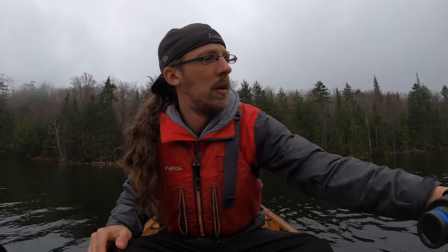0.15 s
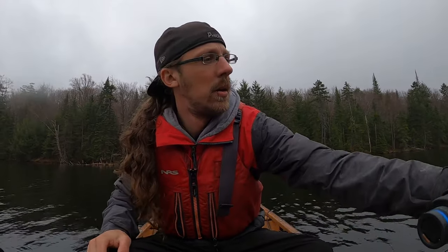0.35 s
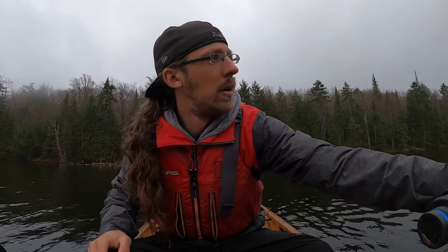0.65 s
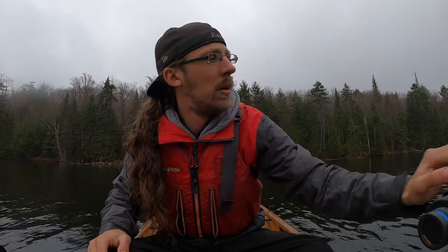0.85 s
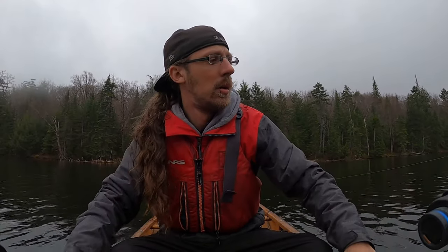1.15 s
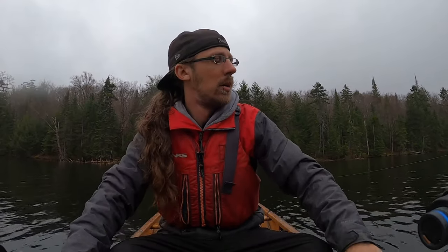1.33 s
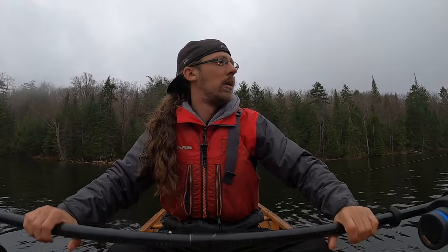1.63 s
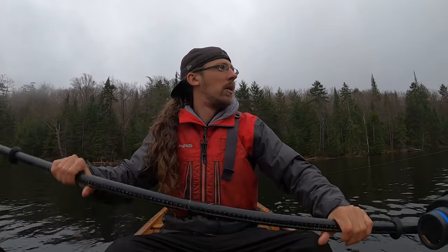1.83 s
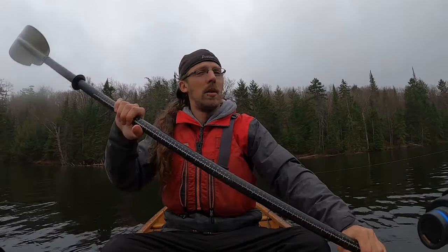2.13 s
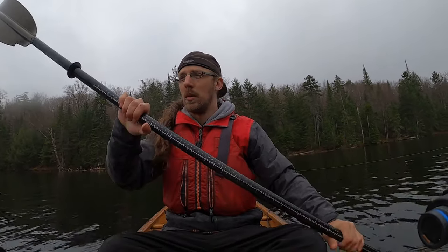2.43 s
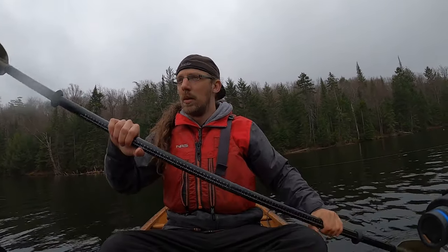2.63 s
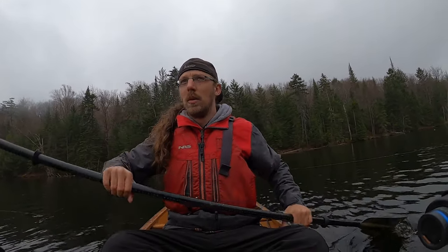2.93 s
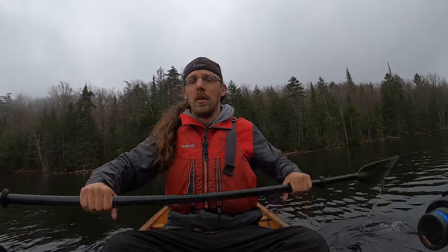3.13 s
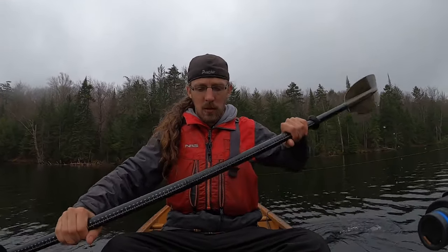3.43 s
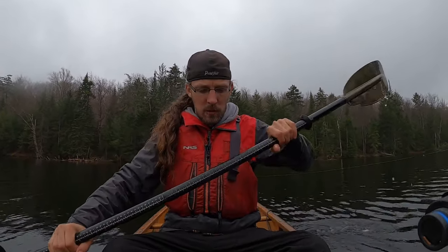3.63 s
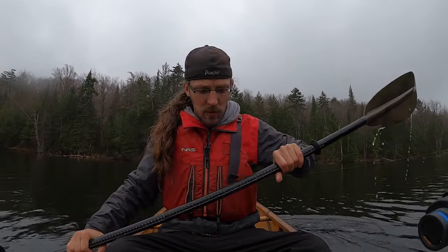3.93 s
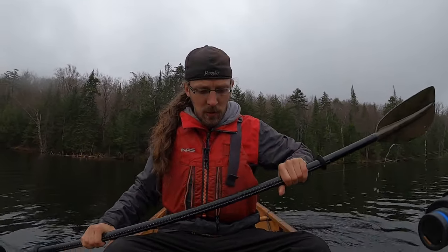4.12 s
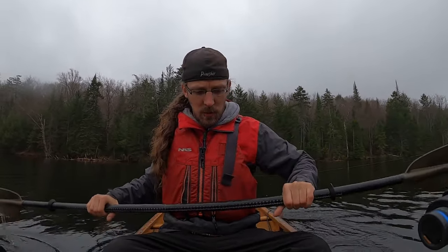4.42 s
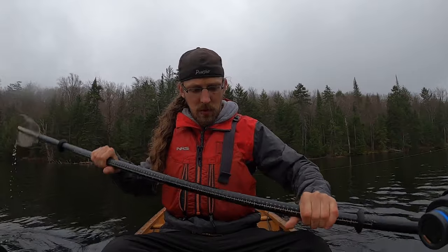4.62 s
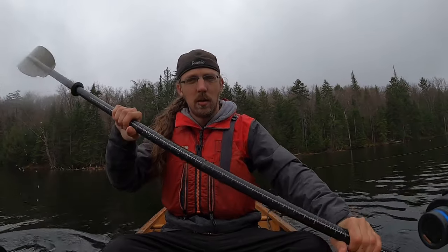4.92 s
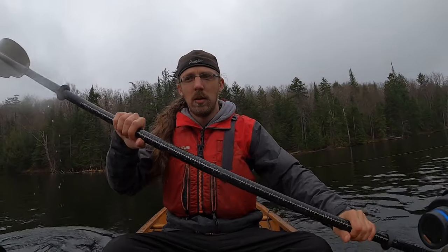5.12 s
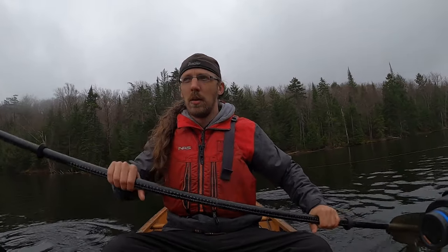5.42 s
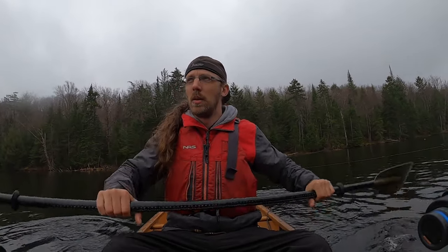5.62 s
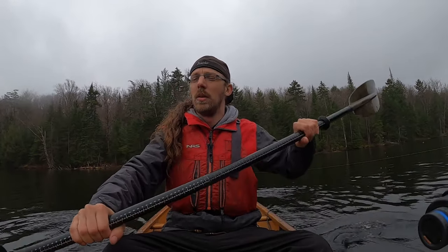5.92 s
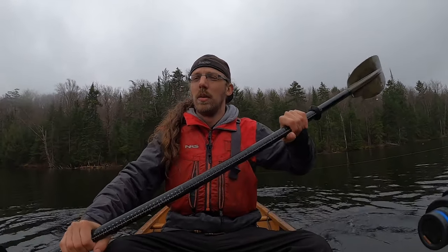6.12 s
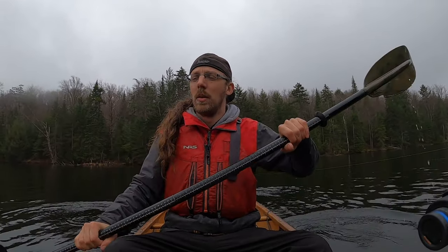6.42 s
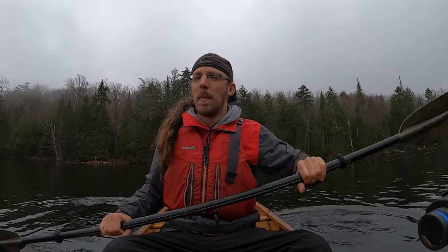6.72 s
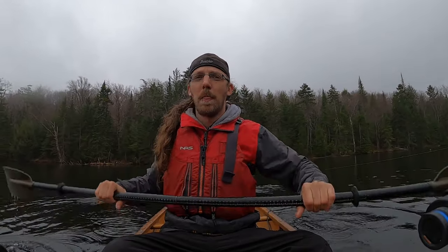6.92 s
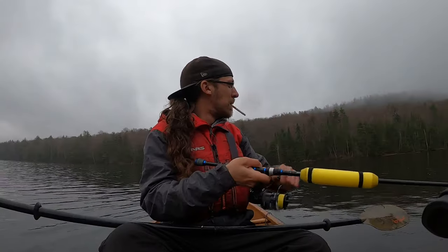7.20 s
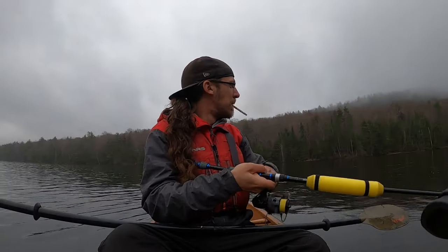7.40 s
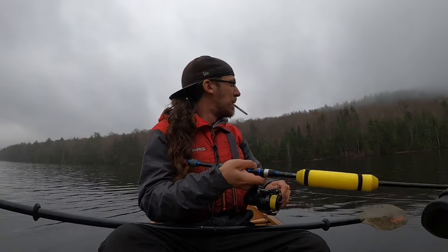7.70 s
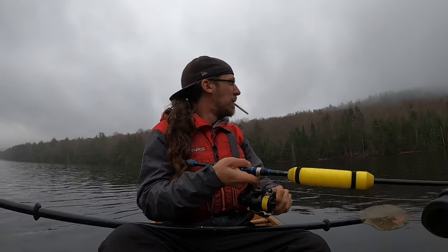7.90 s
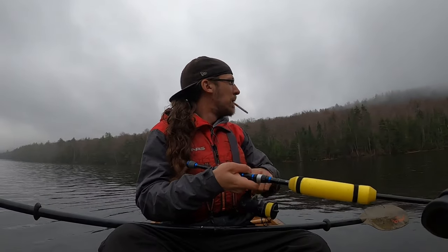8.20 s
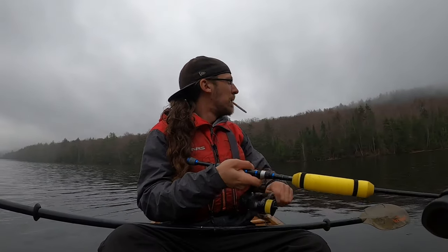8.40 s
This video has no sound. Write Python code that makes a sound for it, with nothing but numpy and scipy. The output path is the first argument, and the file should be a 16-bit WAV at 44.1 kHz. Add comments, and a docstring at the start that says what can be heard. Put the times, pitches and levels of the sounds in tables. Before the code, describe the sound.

In a canoe on a calm lake, wood thuds and nylon swishes give way to close paddle strokes, then a ticking, whirring fishing reel.

```python
"""Canoe on a quiet lake

Out on the water, with the microphone in the boat, a sleeve swishes and the wooden hull booms from blows
on its modes as a double paddle is picked up off the gunwales; its shaft clacks in short bursts of noise.
Four strokes follow, the first centred, then left, right and left: chirping bubbles plop, noise churns, drops fall.
A spinning reel is cranked in two bursts, its rubbing tones and ticking gear teeth following the speed.
Behind it lie the air, ripples on the hull and a light breeze on the microphone."""
import sys
import numpy as np
from scipy import signal
from scipy.fft import rfft, irfft, next_fast_len
from scipy.io import wavfile
from scipy.ndimage import uniform_filter1d, map_coordinates

SR = 44100
rng = np.random.default_rng(int(sys.argv[2]) if len(sys.argv) > 2 else 0)


def wrap_up_sound(samples):
    """Save the sound to the file named by the first command line argument, as 16-bit audio."""
    columns = np.atleast_2d(samples).T
    # keep every value between -1 and 1, then stretch to whole-number steps
    tamed = np.clip(columns, -1, 1)
    steps = np.round(tamed * 32767).astype(np.int16)
    wavfile.write(sys.argv[1], SR, steps)


N = 377055  # length in samples

WET_FROM_S, WET_TO_S = 2.38, 7.18  # the paddle works the water between these times
# The soft wash outgrows the bubbles by this power of the churn; at this churn its level is left unscaled.
WASH_GROWTH, WASH_UNSCALED_DB = .3, -43
WASH_SIDE_SHARE = 0.59  # the wash is spread wider than single plops, so it leans less to the blade's side
# Colours of the wash, deep to fine. Each row: frequency in Hz, relative density in dB per Hz.
GURGLE_SPECTRUM = [(130, -33), (260, -18), (480, 3), (720, 0), (1100, -9)]
CHURN_SPECTRUM = [(450, -22), (800, -1), (1400, 11.5), (2200, 2), (3000, -4), (4500, -43)]
SPRAY_SPECTRUM = [(1800, -1), (3100, -0.5), (5000, -10), (7500, -15), (9500, -22), (13000, -27.5),
                  (16000, -39)]


def strokes():
    """The blade folds in large bubbles, churns up middling ones and throws fine spray, over a soft wash."""
    gurgle, churn, spray = stirring()
    bubbles = gurgle * from_db(3.5) * swarm(per_s=120, low_hz=381.4, high_hz=800, cycles=31.7, rise=0.59)
    bubbles += churn * from_db(-1.0) * swarm(per_s=520, low_hz=826.0, high_hz=2986, cycles=31, rise=0.5)
    bubbles += spray * from_db(-1.5) * swarm(per_s=260, low_hz=2964, high_hz=7500, cycles=35, rise=0.18)
    bubbles += drops(tick_db=-15, tick_t60=0.0071)
    near = plops(tick_db=-24, tick_t60=0.01) + glugs(rough=0.48)
    near += splats(octaves=0.763, cycles=14.5, slap_db=-14.5)

    wash = gurgle * from_db(3.0) * noise(GURGLE_SPECTRUM)
    wash += churn * from_db(-5) * noise(CHURN_SPECTRUM)
    wash += spray * from_db(-0.5) * noise(SPRAY_SPECTRUM)
    wash *= (churn / from_db(WASH_UNSCALED_DB)) ** WASH_GROWTH * from_db(2.26 * drift(60))

    side_db = blade_side()
    spread = in_boat(bubbles, echo_db=-9.5, t60=0.083, apart=1.6) + wash
    near = in_boat(near, echo_db=-9.5, t60=0.059, apart=1.0)
    return spread * pan(WASH_SIDE_SHARE * side_db) + near * pan(side_db)


# The paddle strokes. Each row: blade in, hardest pull and blade out in seconds, gurgle, churn, spray and
# entry splash in dB, lift-out in dB relative to the pull, flung spray in dB, left over right in dB.
STROKES = [(2.725, 2.907, 3.076, -52, -46.5, -57.5, -54.5, -11.5, -50.5, 0),
           (3.75, 3.82, 4.42, -61, -55, -65, -76, 9, -61, 4.5),
           (5.1, 5.434, 5.6, -51.5, -39.5, -53.5, -62, -13, -90, -3),
           (6.44, 6.74, 6.8, -57, -46, -53.5, -49, -5.5, -54, 5)]
ENTRY_DB, PULL_FADE_DB_PER_S = -11.5, 39  # the wash builds from entry to hardest pull, then dies away
LIFT_RISE_S, LIFT_FALL_S = 0.068, 0.075  # the burst as the blade leaves the water
# Spray thrown as the blade enters, and the churn with it in dB relative to that spray.
SPLASH_RISE_S, SPLASH_FALL_S, SPLASH_CHURN_DB = 0.028, 0.17, -4
FLUNG_AFTER_S, FLUNG_SPREAD_S = 0.22, 0.15  # spray flung off the blade lands a moment later
# Water running off the raised blade: gurgle, churn and spray in dB, then how it fades and how long it runs.
DRAIN_DB, DRAIN_FADE_DB_PER_S, DRAIN_S = [-60.5, -51.5, -61.5], 12, 0.457
# The least the water is stirred meanwhile: gurgle, churn and spray in dB.
TRICKLE_DB = [-72.5, -59, -63.5]


def stirring():
    """Gurgle, churn and spray strengths: a stroke splashes in, pulls, bursts out, flings spray and drains."""
    t = np.arange(N) / SR
    power = from_db(TRICKLE_DB)[:, None] ** 2 * np.ones(N)
    for enter, hardest, leave, gurgle_db, churn_db, spray_db, splash_db, lift_db, flung_db, _ in STROKES:
        pull_db = np.interp(t, [enter, hardest], [ENTRY_DB, 0])
        pull_db = pull_db - PULL_FADE_DB_PER_S * np.maximum(t - hardest, 0)
        lift = swells([(leave, lift_db, LIFT_RISE_S, LIFT_FALL_S)])
        effort = from_db(pull_db) * during(enter, leave) + lift
        drain = from_db(-DRAIN_FADE_DB_PER_S * np.maximum(t - leave, 0)) * during(leave, leave + DRAIN_S)
        splash = swells([(enter + SPLASH_RISE_S, splash_db, SPLASH_RISE_S, SPLASH_FALL_S)])
        flung = swells([(leave + FLUNG_AFTER_S, flung_db, FLUNG_SPREAD_S, FLUNG_SPREAD_S)])
        power += np.outer(from_db([gurgle_db, churn_db, spray_db]), effort) ** 2
        power += np.outer(from_db(DRAIN_DB), drain) ** 2
        power[1] += (from_db(SPLASH_CHURN_DB) * splash) ** 2
        power[2] += splash ** 2 + flung ** 2
    return np.sqrt(power) * during(WET_FROM_S, WET_TO_S)


def blade_side():
    """The water sounds move to each stroke's side as its blade enters: left over right in dB."""
    t, side_db = np.arange(N) / SR, np.zeros(N)
    for enter, *_, db in STROKES:
        side_db[t > enter - .03] = db
    return uniform_filter1d(side_db, SR // 20)


# The loudest bubbles and drops. Each row: start in seconds, level in dB, pitch in Hz, 60 dB decay time
# in seconds, relative rise in pitch over the ring.
PLOPS = [(2.411, -33, 1730, 0.044, 0.53), (2.449, -25, 2720, 0.012, 0.11),
         (2.678, -18, 3920, 0.0018, -0.04), (2.7315, -21, 872, 0.03, 0.055), (2.729, -21, 2060, 0.02, 0.17),
         (2.758, -15, 650, 0.03, 0.049), (3.047, -20.5, 1960, 0.013, .6), (3.244, -32, 283, .16, 0.21),
         (3.261, -29.5, 530, .05, 0.19), (3.2792, -16, 970, 0.011, .1), (3.456, -33.5, 1760, 0.033, 0.12),
         (3.649, -31.5, 1300, 0.019, .2), (3.853, -7.5, 1600, .012, 0.042), (3.912, -26, 2560, 0.019, 0.35),
         (3.97, -22, 1540, 0.0053, .1), (4.017, -31, 2068, .014, 0.32), (4.058, -27.5, 3620, 0.0042, .1),
         (4.2072, -29, 1505, 0.027, 0.26), (4.3824, -23, 1340, 0.028, 1), (4.409, -22.5, 630, 0.02, 0.23),
         (4.6286, -26.5, 3300, 0.007, 0.16), (4.7474, -26.5, 2050, 0.008, 0.029),
         (5.263, -22, 564, 0.047, 0), (5.3506, -18.5, 1470, 0.012, 0.18), (5.374, -25, 2030, .015, .4),
         (5.412, -17, 2150, 0.0082, 0.0027), (5.4391, -21.5, 1170, 0.018, .2),
         (5.482, -21, 1490, .017, 0.024), (5.534, -21.5, 1390, 0.019, 0.017),
         (5.5383, -11.5, 4930, 0.005, 0.16), (5.718, -29, 1086, 0.083, -0.3),
         (5.877, -28.5, 1130, 0.021, .1), (6.061, -32.5, 380, 0.11, -0.01),
         (6.2463, -21.5, 1940, 0.0056, 0.23), (6.3129, -21.5, 1170, 0.016, 0.17),
         (6.431, -27.5, 4260, 0.012, 0.21), (6.54, -27, 3720, 0.012, 0.39), (6.56, -25, 2140, .012, 0.21),
         (6.6359, -27.5, 388, 0.045, .1), (6.7659, -21.5, 1380, 0.019, 0.44),
         (6.959, -28.5, 4160, 0.0079, -0.067), (6.98, -26, 394, .043, 0.34), (7.038, -22, 1610, .015, 0.12)]


def plops(tick_db, tick_t60):
    """The surface breaks with a tick around the bubble's own pitch, and the bubble rings."""
    out, t = np.zeros(N), np.arange(SR // 15) / SR
    for s, db, hz, t60, rise in PLOPS:
        band = signal.butter(2, [hz / 2, min(2.2 * hz, 8000)], "band", fs=SR, output="sos")
        tick = rms_one(signal.sosfilt(band, rng.standard_normal(len(t))))
        tick = tick * from_db(tick_db - 60 * t / tick_t60)
        add(out, s, from_db(db) * tick)
        add(out, s, from_db(db) * bubble(hz, t60, rise))
    return out


# Air pockets in the eddies gurgle and chirp, mostly upwards. Each row: start in seconds, level in dB,
# starting pitch in Hz, final pitch in Hz, length in seconds.
GLUGS = [(2.401, -46.5, 1094, 1450, 0.038), (2.672, -41.5, 797, 960, 0.029), (2.775, -43, 661, 597, 0.07),
         (2.859, -39.5, 215, 230, 0.042), (2.9, -36.5, 335, 470, 0.053), (3.016, -38.5, 1675, 2000, 0.034),
         (3.044, -38.5, 974, 1160, 0.032), (3.16, -38, 1320, 2400, .016), (3.392, -43.5, 1194, 1470, 0.033),
         (3.616, -39.5, 890, 1660, 0.026), (3.788, -43.5, 1290, 1800, 0.023),
         (3.821, -39.5, 360, 314, 0.032), (3.935, -39, 607, 900, .04), (4.029, -44.5, 1020, 1250, 0.026),
         (4.243, -43, 2020, 3360, 0.013), (4.346, -46.5, 379, 683, 0.065), (4.418, -41.5, 573, 618, 0.054),
         (4.496, -43, 558, 1190, 0.029), (4.536, -41, 780, 660, 0.033), (4.666, -53, 285, 425, 0.13),
         (4.762, -42.5, 750, 1190, .028), (6.456, -47, 437, 527, 0.058), (6.81, -44.5, 212, 184, 0.091),
         (7.013, -40.5, 442, 598, 0.042), (7.119, -40.5, 985, 1950, .022)]


def glugs(rough):
    """A pocket swells in sound and fades, its pitch sliding faster towards the end."""
    out, flutter = np.zeros(N), 1 + rough * drift(94)
    for s, db, hz, final_hz, length in GLUGS:
        u = np.linspace(0, 1, int(length * SR))
        pitch = hz * (final_hz / hz) ** (u ** 1.28)
        add(out, s, from_db(db) * np.sin(np.pi * u) * np.sin(2 * np.pi * np.cumsum(pitch) / SR))
    return out * flutter


# Dollops of water slop off the blade and break into bubbles. Each row: start in seconds, relative level
# in dB, centre pitch in Hz, length in seconds.
SPLATS = [(2.869, -42.5, 1780, .022), (2.916, -40.5, 1380, .035), (3.213, -42.5, 1850, .014),
          (3.365, -41.5, 2700, 0.021), (3.775, -47.5, 2880, 0.009), (4.323, -44.5, 1450, .016),
          (4.403, -38.5, 1530, 0.026), (4.511, -44.5, 1550, 0.012), (5.143, -33.5, 1680, 0.0088),
          (5.163, -37.5, 1650, 0.017), (5.64, -34.5, 1970, 0.0085), (5.834, -43.5, 2040, .022),
          (6.003, -42.5, 1900, 0.014), (6.461, -50.5, 4800, 0.013), (6.506, -43, 1900, 0.013),
          (6.692, -39, 2970, .018), (6.98, -36, 1520, 0.017)]
SPLAT_BUBBLES_PER_S = 700


def splats(octaves, cycles, slap_db):
    """A dollop slaps the surface and traps a quick run of bubbles around one pitch."""
    out, t = np.zeros(N), np.arange(SR // 12) / SR
    for s, db, hz, length in SPLATS:
        cluster = np.zeros(len(t))
        for when, pitch, size in rng.random((int(SPLAT_BUBBLES_PER_S * length) + 2, 3)):
            bubble_hz = hz * 2 ** (octaves * (2 * pitch - 1))
            at = int(when * length * SR)
            ring = from_db(-10 * size) * bubble(bubble_hz, cycles / bubble_hz, rise=0.36)[:len(t) - at]
            cluster[at:at + len(ring)] += ring
        band = signal.butter(2, [hz / 2, min(3 * hz, 8000)], "band", fs=SR, output="sos")
        slap = signal.sosfilt(band, rng.standard_normal(len(t))) * np.exp(-(t / length) ** 2)
        splat = rms_one(rms_one(cluster) + from_db(slap_db) * rms_one(slap))
        add(out, s, from_db(db) * np.sqrt(length / t[-1]) * splat)
    return out


DROPS_PER_S, DROP_DB, DROP_SPREAD_DB = 11, -37.5, 7  # the weakest drops are the spread quieter
# Range of pitch, typical ring, and typical relative rise in pitch over the ring.
DROP_LOW_HZ, DROP_HIGH_HZ, DROP_T60_S, DROP_RISE = 1104, 4640, 0.019, 0.66


def drops(tick_db, tick_t60):
    """Single drops fall at random; each ticks and its small bubble chirps upwards, varied in ring and slope."""
    out, ticks, t = np.zeros(N), np.zeros(N), np.arange(SR // 50) / SR
    span = WET_TO_S - WET_FROM_S
    for when, pitch, size, damping, depth in rng.random((int(DROPS_PER_S * span), 5)):
        s, gain = WET_FROM_S + when * span, from_db(DROP_DB - DROP_SPREAD_DB * size)
        hz = DROP_LOW_HZ * (DROP_HIGH_HZ / DROP_LOW_HZ) ** pitch
        t60 = DROP_T60_S * 2 ** (2 * damping - 1)
        add(out, s, gain * bubble(hz, t60, DROP_RISE * 2 * depth))
        add(ticks, s, gain * from_db(tick_db - 60 * t / tick_t60))
    return out + ticks * dull(rng.standard_normal(N), hz=5000)


CLUSTERS_PER_S, CLUSTER_S = 60, .007  # how often clusters are born, and the mean delay within one


def swarm(per_s, low_hz, high_hz, cycles, rise):
    """Small bubbles of random size and pitch, born in clusters while the paddle works; rms 1 over that time."""
    out, span = np.zeros(N), WET_TO_S - WET_FROM_S
    clusters = rng.uniform(WET_FROM_S, WET_TO_S, int(CLUSTERS_PER_S * span))
    for which, delay, pitch, size, damping, depth in rng.random((int(per_s * span), 6)):
        s = clusters[int(which * len(clusters))] - CLUSTER_S * np.log(1 - delay)
        hz = low_hz * (high_hz / low_hz) ** pitch
        t60 = cycles / hz * 2 ** (2 * damping - 1)
        gain = from_db(20 * size ** 2)
        add(out, s, gain * bubble(hz, t60, 2 * rise * depth ** 2))
    return rms_one(out) * np.sqrt(span * SR / N)


def bubble(hz, t60, rise):
    """A trapped air pocket swells within a cycle or two and rings; a positive rise lifts its pitch."""
    t = np.arange(int(min(abs(t60), .3) * SR) + 8) / SR
    cycles = hz * t * (1 + rise * t / t60 / 2)
    onset = 1 - np.exp(-(1.6 * hz * t) ** 2)
    return np.sin(2 * np.pi * cycles) * from_db(-60 * t / t60) * onset


# Blows on the hull. Each row: start in seconds, relative strength in dB, contact brightness in Hz,
# deep boom relative to the woody ring in dB.
KNOCKS = [(.001, -26.5, 227, 2.5), (.049, -26, 700, -8), (.064, -26.5, 790, 2), (.237, -33, 1870, -18),
          (.244, -20.5, 1170, -6.5), (.295, -22.5, 300, -7), (.562, -35.5, 1890, -10),
          (.572, -32.5, 900, -4.5), (.877, -25, 325, 6), (.908, -18.5, 200, 2.5), (1.007, -27, 189, 2),
          (1.317, -27.5, 198, 0.5), (1.4, -24, 600, -3.5), (1.425, -23, 264, 1), (1.514, -19.5, 192, -4),
          (1.559, -23.5, 262, -2), (1.98, -32, 99, 0.5), (2.076, -45, 1220, -4.5), (2.857, -43, 400, -11),
          (4.402, -25.5, 303, -7.5)]
# Modes of the hull and its gunwales. Each row: frequency in Hz, relative level in dB, 60 dB decay in seconds.
HULL_MODES = [(62.3, -12, 0.43), (98.4, -3, 0.47), (120.3, -16, 0.72), (153.5, -1.5, 0.34),
              (174.2, -0.5, 0.18), (201.5, -3.5, 0.22), (233.3, -13.5, 0.59), (306.3, -5, 0.17),
              (441, -8, 0.078), (512, -2.5, 0.077), (582.6, -3, 0.087), (701, -10, 0.1), (950, -7.5, 0.054),
              (1030, -6.5, 0.067), (1620, -4, 0.05), (1780, -41, .05), (2400, -11, 0.058)]
BOOM_BELOW_HZ = 350  # modes of the whole shell lie below this, those of the gunwales above
# After each blow the weight settles with a softer bump, no brighter than this.
SETTLE_S, SETTLE_DB, SETTLE_HZ = .036, -5, 236


def hull(rattle_db, rattle_t60, contact_cycles):
    """Blows ring the hull's modes and rattle the trim; dull contacts build slowly and favour low modes."""
    out, t = np.zeros(N), np.arange(SR // 2) / SR
    hz, mode_db, t60 = np.transpose(HULL_MODES)[:, :, None]
    rings = np.sin(2 * np.pi * hz * t) * from_db(mode_db - 60 * t / t60)
    is_boom = hz[:, 0] < BOOM_BELOW_HZ
    above_boom = signal.butter(2, 500, "high", fs=SR, output="sos")
    bumps = [(s + SETTLE_S, db + SETTLE_DB, min(bright_hz, SETTLE_HZ), boom_db)
             for s, db, bright_hz, boom_db in KNOCKS]
    for s, db, bright_hz, boom_db in KNOCKS + bumps:
        strengths = from_db(rng.normal(0, .7, len(HULL_MODES)) + boom_db * is_boom)
        rattle = signal.sosfilt(above_boom, rng.standard_normal(len(t)))
        rattle = from_db(rattle_db - 60 * t / rattle_t60) * rattle
        contact = np.minimum(t * bright_hz / contact_cycles, 1)
        add(out, s, from_db(db - 7.0) * dull(contact * (strengths @ rings + rattle), bright_hz))
    return in_boat(out + booms(), echo_db=-33.0, t60=0.075, apart=1.7)


# The hull's skin gives under shifting weight with a short, hollow note. Each row: peak in seconds,
# level in dB, pitch in Hz.
BOOMS = [(0.919, -20, 151), (1.334, -21.5, 163.6), (1.417, -19.5, 162.4), (1.571, -22, 167)]
BOOM_RISE_S, BOOM_FALL_S = 0.016, 0.01


def booms():
    """Each flex of the skin swells and dies within a few cycles."""
    t = np.arange(N) / SR
    return sum(swells([(s, db, BOOM_RISE_S, BOOM_FALL_S)]) * np.cos(2 * np.pi * hz * (t - s))
               for s, db, hz in BOOMS)


# The paddle shaft clacks and scuffs. Each row: start in seconds, level in dB, brightness in Hz,
# 60 dB decay in seconds.
CLACKS = [(.846, -56, 9000, 0.26), (.862, -37, 9600, 0.086), (.876, -38, 4300, 0.067),
          (.980, -36, 3400, 0.022), (1.402, -45.5, 4140, 0.049), (2.241, -41.5, 4340, 0.13),
          (2.254, -22, 1010, 0.067)]
# Colour of the shaft. Each row: frequency in Hz, relative density in dB per Hz.
SHAFT_SPECTRUM = [(300, -22), (480, -1), (740, -6.5), (1100, -9), (1800, -4), (3000, -5), (4700, -6),
                  (6500, -5.5), (10000, -14), (15000, -24)]


def shaft():
    """The hollow shaft gives short dry clacks with little bass."""
    out, t = np.zeros((2, N)), np.arange(SR // 5) / SR
    crack = noise(SHAFT_SPECTRUM)
    for k, (s, db, bright_hz, t60) in enumerate(CLACKS):
        burst = crack[:, k * len(t):(k + 1) * len(t)] * from_db(db - 60 * t / t60)
        add(out, s, dull(burst, bright_hz))
    high_pass = signal.butter(2, 300, "high", fs=SR, output="sos")
    return signal.sosfilt(high_pass, out + 1e-18)  # the tiny offset keeps the filter off denormal numbers


# The sleeve over the life vest, then the nylon pressed harder. Each row: peak in seconds, level in dB,
# rise in seconds, fall in seconds.
SWISHES = [(.02, -60.5, .1, 0.46), (.23, -59, 0.12, 0.12), (1.28, -57, 0.13, 0.19),
           (7.97, -68, 0.09, 0.064)]
SCRAPES = [(1.27, -56.5, 0.053, 0.1)]
# Colours of the swish and the scrape. Each row: frequency in Hz, relative density in dB per Hz.
CLOTH_SPECTRUM = [(400, -2.5), (900, 0), (1600, 3), (3000, -0.5), (5000, -5), (7500, -11), (10000, -22.5),
                  (15000, -31)]
SCRAPE_SPECTRUM = [(1300, -11), (2000, 1), (3500, -1), (5000, -8), (9000, -23)]
RUSTLE_DB, RUSTLE_FROM_S, RUSTLE_TO_S = -69, .9, 2.7  # the jacket stays astir while the paddle is lifted


def sleeve(grain_db):
    """Nylon slides on nylon with a fine grain, and scrapes where it is pressed."""
    rubbing = np.hypot(swells(SWISHES), from_db(RUSTLE_DB) * during(RUSTLE_FROM_S, RUSTLE_TO_S))
    cloth = rubbing * noise(CLOTH_SPECTRUM) + swells(SCRAPES) * noise(SCRAPE_SPECTRUM)
    return from_db(grain_db * drift(120)) * cloth


# Hands on the wet shaft. Each row: start in seconds, pitch in Hz, level in dB, 60 dB decay in seconds.
SQUEAKS = [(1.695, 4020, -57, 0.4)]


def squeak(s, hz, db, t60):
    """A thin squeak as the hands close on the wet shaft: noise through one narrow resonance."""
    age = np.maximum(np.arange(N) / SR - s, 0)
    envelope = from_db(db - 60 * age / t60) * np.minimum(age / .01, 1)
    return envelope * resonances(rng.standard_normal(N), [(hz, 130, 0)])


# How fast the reel turns. Each row: time in seconds, relative speed.
CRANK_SPEED = [(7.2, 1.016), (7.29, 0.93), (7.38, 0.96), (7.47, 0.92), (7.56, 0.85), (7.635, 0.66),
               (7.71, 0.87), (7.8, .57), (8.25, 0.65), (8.41, 0.69), (8.55, 0.87)]
# Rubbing tones at speed 1, then the housing's resonances. Each row: frequency in Hz, width in Hz,
# relative level in dB.
WHIRR_TONES = [(1350, 50, -3), (1740, 60, -7), (2150, 35, 0), (2550, 50, -8), (3150, 60, -11),
               (3800, 70, -9)]
REEL_BODY = [(1700, 180, -5.5), (2100, 250, -1.5), (2920, 470, -11.5), (3280, 310, -7), (4180, 320, -13.5),
             (5030, 440, -16), (7290, 490, -15)]
# Colour of the gear hiss. Each row: frequency in Hz, relative density in dB per Hz.
GEAR_HISS = [(150, -9.5), (500, -4), (1000, -33), (3000, 4), (5500, -7.5), (7700, -9), (9500, -15),
             (13000, -27.5), (16000, -43.5)]
TEETH_PER_S, TOOTH_SHARPNESS = 280, 0.46  # gear teeth meet at this rate at speed 1; how sharply each ticks
REEL_LOUDNESS_POWER = 0.46  # amplitude grows with this power of the speed


def reel(rotor_hz, wobble, throb_db, grain_db):
    """Rubbing tones follow the crank and waver with each rotor turn; gear teeth tick and ring the housing."""
    speed, = in_time(CRANK_SPEED)
    turn = np.sin(2 * np.pi * np.cumsum(rotor_hz * speed) / SR)
    travel = np.cumsum(speed * (1 + wobble * turn + .028 * drift(21.15)))
    # Steady tones are read at the travelled position, so their pitch follows the speed.
    whirr = resonances(rng.standard_normal(N), WHIRR_TONES)
    whirr = map_coordinates(whirr, [travel % (N - 1)], order=3)
    whirr = in_boat(whirr, echo_db=-8.5, t60=0.032, apart=1.2) * from_db(-2.5 + throb_db * turn)

    tooth_phase = travel * TEETH_PER_S / SR % 1
    teeth = rms_one(np.exp(-2 * TOOTH_SHARPNESS * tooth_phase))
    chatter = teeth * from_db(grain_db * drift(130))
    housing = resonances(chatter * rng.standard_normal(N), REEL_BODY)
    housing = in_boat(housing, echo_db=-0.5, t60=0.022, apart=0.61)
    parts = whirr + from_db(-7.0) * housing + from_db(-12.5) * chatter * noise(GEAR_HISS)
    return cranking() * speed ** REEL_LOUDNESS_POWER * parts


# Bursts of cranking. Each row: start in seconds, stop in seconds, relative level at speed 1 in dB,
# run-up in seconds, run-down in seconds.
CRANKS = [(7.156, 7.789, -40.5, 0.029, 0.064), (8.091, 8.546, -42, 0.16, 0.051)]


def cranking():
    """Each burst of cranking runs up, holds and runs down."""
    t, level = np.arange(N) / SR, 0
    for start, stop, db, up, down in CRANKS:
        run_up = np.clip((t - start) / up, 0, 1) ** 2
        run_down = np.clip(1 - (t - stop) / down, 0, 1) ** 2
        level = level + from_db(db) * run_up * run_down
    return level


# The rocking boat's ripples on the hull, then gusts on the microphone. Each row: peak in seconds,
# level in dB, rise in seconds, fall in seconds.
ROCKINGS = [(.1, -60, .3, 1.9), (2.9, -72, 0.73, 1.5), (3.95, -56, 0.057, 0.067), (4.40, -53, 0.2, 0.14),
            (6.8, -59, 0.79, 0.33)]
GUSTS = [(.1, -50, .3, 0.51), (5.3, -64, 0.4, 0.33), (6.7, -47.5, 0.14, 0.11), (8.11, -60.5, 0.038, 0.081),
         (8.47, -58.5, 0.08, 0.064)]
# Colours of ripples, wind and air. Each row: frequency in Hz, relative density in dB per Hz.
HULL_MURMUR = [(90, -8), (150, 9), (200, 1.5), (280, -5), (500, -15)]
BUFFET_SPECTRUM = [(20, 1), (40, -5), (65, -15.5), (120, -33.5), (250, -19.5)]
AIR_SPECTRUM = [(25, -11), (60, -15), (100, -24), (170, -9.5), (500, -6.5), (1000, -9), (2000, -7),
                (4000, -12), (7500, -14), (10000, -28.5), (15000, -29.5)]
LAPPING_DB, BREEZE_DB, AIR_DB = -85, -70, -73  # steady levels beneath the swells


def lake():
    """Air over the water, ripples on the hull and a light breeze on the microphone, all coloured noise."""
    ripples = (from_db(LAPPING_DB) + swells(ROCKINGS)) * from_db(2.0 * drift(1.5)) * noise(HULL_MURMUR)
    breeze = (from_db(BREEZE_DB) + swells(GUSTS)) * from_db(3 * drift(8)) * noise(BUFFET_SPECTRUM)
    return from_db(AIR_DB) * noise(AIR_SPECTRUM) + ripples + breeze


def in_boat(x, echo_db, t60, apart):
    """Quick reflections from hull, paddler and water smear a sound; the ears differ more as pitch goes up."""
    t = np.arange(int(.15 * SR)) / SR
    shared, own = rng.standard_normal((2, len(t))) * from_db(-60 * t / t60) * (t > .001)
    own = signal.sosfilt(signal.butter(1, 2000, "high", fs=SR, output="sos"), own)
    echoes = (shared + apart * own * np.array([[1], [-1]])) / np.sqrt(np.sum(shared ** 2))
    return x + from_db(echo_db) * signal.fftconvolve(x[None], echoes, axes=1)[:, :N]


# How alike the two ears hear noise. Each row: frequency in Hz, left-right correlation.
LIKENESS = [(30, 0.37), (150, 0.97), (2000, 1), (14000, 0.97)]


def noise(spectrum, size=N):
    """Coloured stereo noise, nearly alike in both ears except in the deepest bass; rms 1."""
    padded = next_fast_len(size)
    hz = np.maximum(np.arange(padded // 2 + 1) * SR / padded, 1)
    outside = np.minimum(hz / spectrum[0][0], 1) ** 2 * np.minimum(spectrum[-1][0] / hz, 1) ** 2
    mid, side = rfft(rng.standard_normal((2, padded))) * from_db(at_hz(spectrum, hz)) * outside
    alike = np.clip(at_hz(LIKENESS, hz), -1, 1)
    ears = np.sqrt(1 + alike) * mid + np.sqrt(1 - alike) * side * [[1], [-1]]
    return rms_one(irfft(ears, padded)[:, :size])


def resonances(x, table):
    """Parallel resonances of alternating sign; rms 1."""
    out = 0
    for k, (hz, width, db) in enumerate(table):
        r = np.exp(-np.pi * width / SR)
        zeros = np.array([1, 0, -1]) * (1 - r * r) / 2
        poles = [1, -2 * r * np.cos(2 * np.pi * hz / SR), r * r]
        out = out + (-1) ** k * from_db(db) * signal.lfilter(zeros, poles, x)
    return rms_one(out)


def swells(rows):
    """Bell-shaped swells, each about 9 dB down one rise time before its peak and one fall time after it."""
    t = np.arange(N) / SR
    return sum(from_db(db) * np.exp(-((t - s) / np.where(t < s, rise, fall)) ** 2)
               for s, db, rise, fall in rows)


def drift(rate):
    """Slow random wander of spread 1, made at a fortieth of the sample rate; the rate is in Hz."""
    r = np.exp(-80 * np.pi * rate / SR)
    slow = signal.lfilter([1], [1, -2 * r, r * r], rng.standard_normal(N // 40 + 2002))
    slow = slow[2000:]  # drop the filter's start-up
    return np.interp(np.arange(N) / 40, np.arange(len(slow)), rms_one(slow))


def during(start, end):
    """1 from start to end, with short fades outside."""
    t = np.arange(N) / SR
    return np.clip(np.minimum(t - start, end - t) / .02 + 1, 0, 1)


def in_time(rows):
    """Each column of a curve, sample by sample."""
    s, *columns = np.transpose(rows)
    return [np.interp(np.arange(N) / SR, s, c) for c in columns]


def at_hz(points, hz):
    """Read a spectrum on a log-frequency axis."""
    f, value = np.transpose(points)
    return np.interp(np.log(hz), np.log(f), value)


def dull(x, hz):
    """Two-pole low-pass."""
    return signal.sosfilt(signal.butter(2, min(hz, SR / 2 - 1000), fs=SR, output="sos"), x)


def pan(db):
    """Left and right gains of constant power."""
    gains = from_db(np.array([db, -db]) / 2)
    return gains / np.sqrt(np.mean(gains ** 2, axis=0))


def add(track, s, sound):
    """Mix a short sound in at time s."""
    at = int(np.clip(s * SR, 0, N - 1))
    track[..., at:at + sound.shape[-1]] += sound[..., :N - at]


def from_db(db):
    """Decibels to gain."""
    return 10 ** (np.asarray(db) / 20)


def rms_one(x):
    """Scale to rms 1."""
    return x / np.sqrt(np.mean(x ** 2) + 1e-20)


def scene():
    """Paddle, hull, jacket and reel are within arm's reach of the microphone, with the lake around them."""
    handling = hull(rattle_db=1.0, rattle_t60=0.11, contact_cycles=1.65) + shaft()
    handling = handling + sleeve(grain_db=1.5) + sum(squeak(*row) for row in SQUEAKS)
    cranked = reel(rotor_hz=22.88, wobble=0.0538, throb_db=1.5, grain_db=3.0)
    return strokes() + handling + cranked + lake()


CUTOFF_HZ = 15700


def record(dry):
    """The top is cut steeply."""
    return signal.sosfilt(signal.ellip(10, .1, 80, CUTOFF_HZ, fs=SR, output="sos"), dry)


dry = scene()
out = record(dry)
wrap_up_sound(out)
```